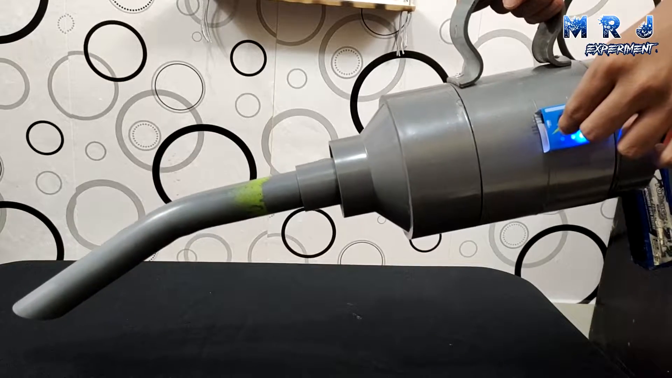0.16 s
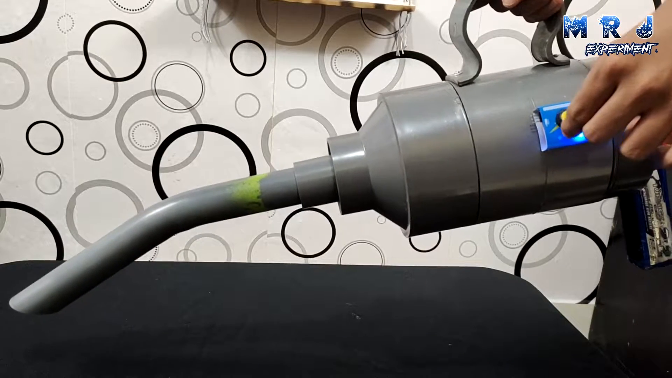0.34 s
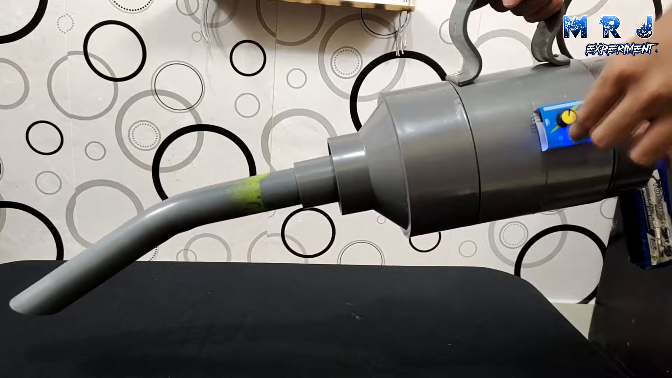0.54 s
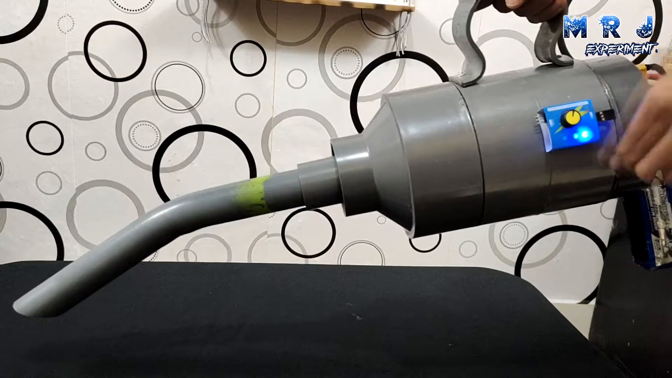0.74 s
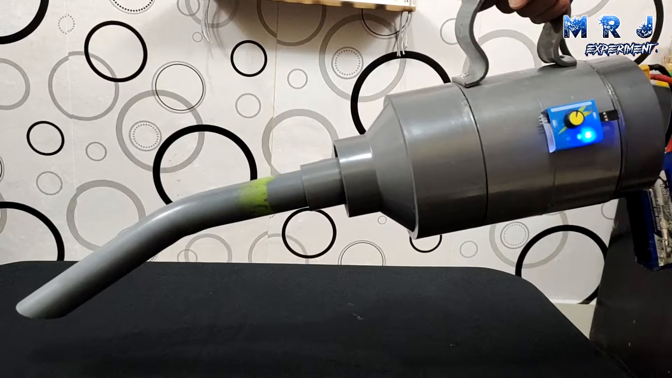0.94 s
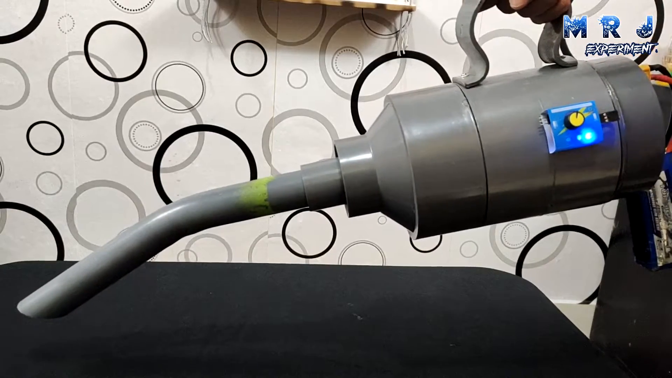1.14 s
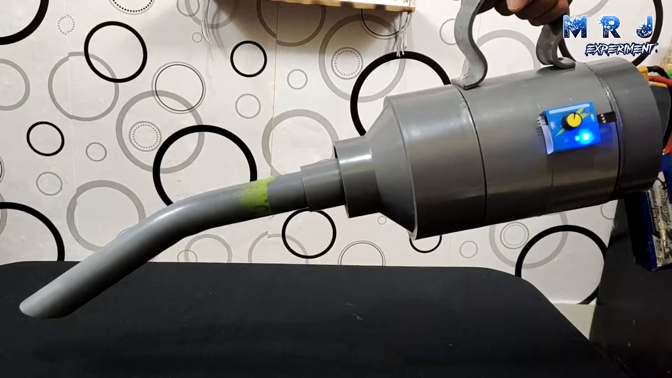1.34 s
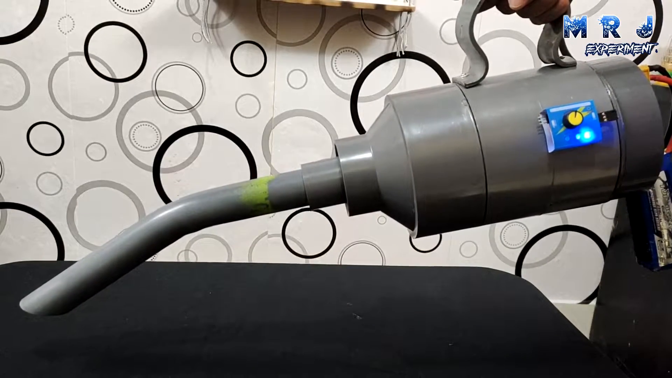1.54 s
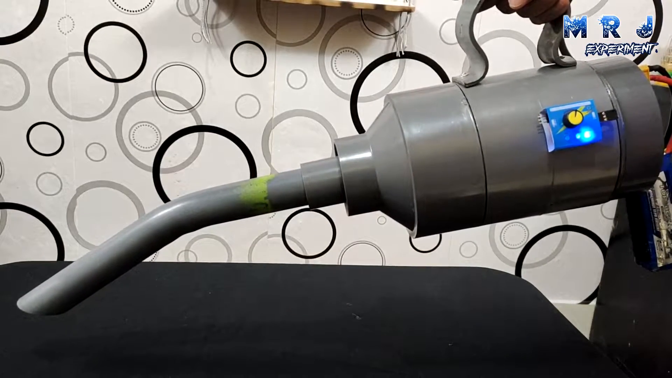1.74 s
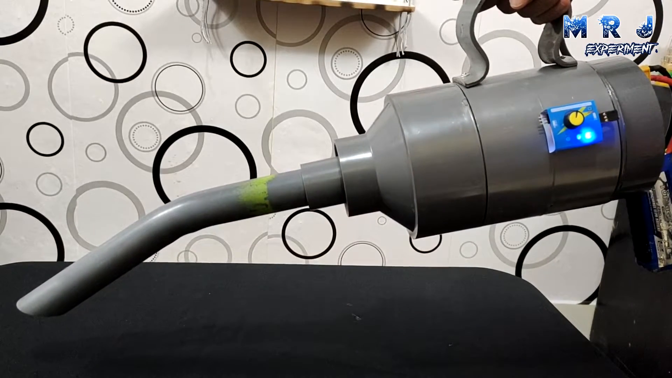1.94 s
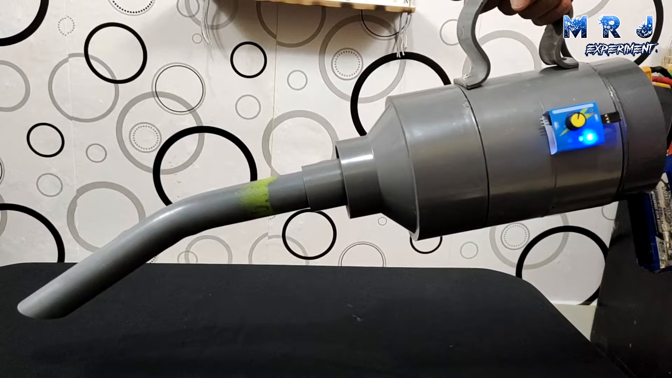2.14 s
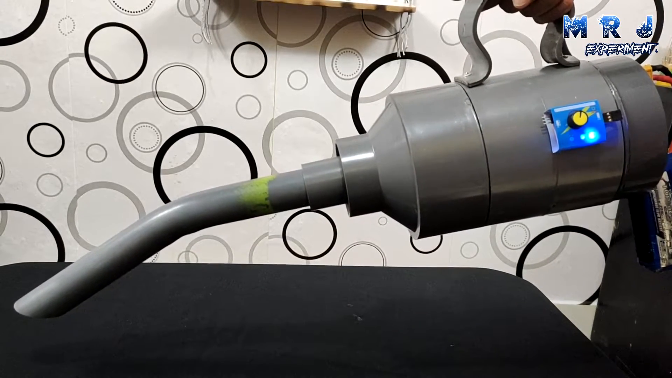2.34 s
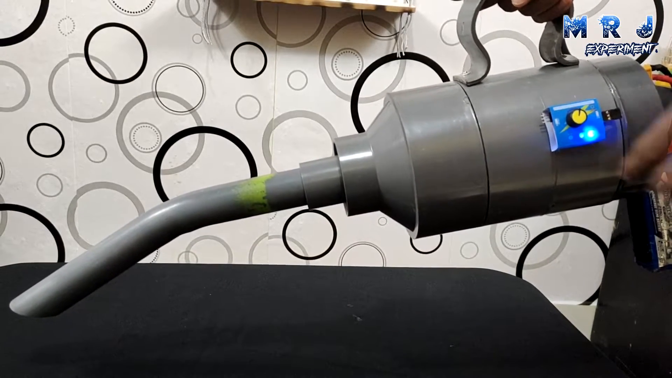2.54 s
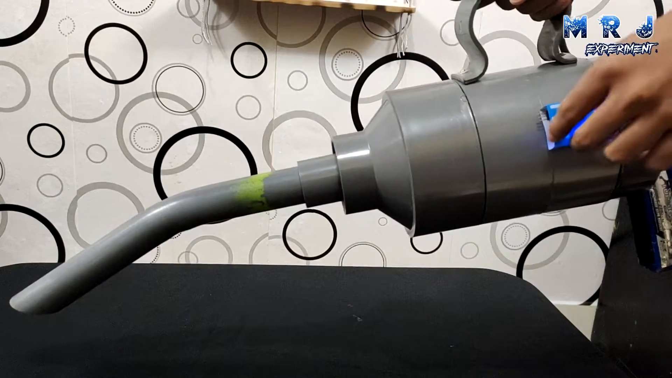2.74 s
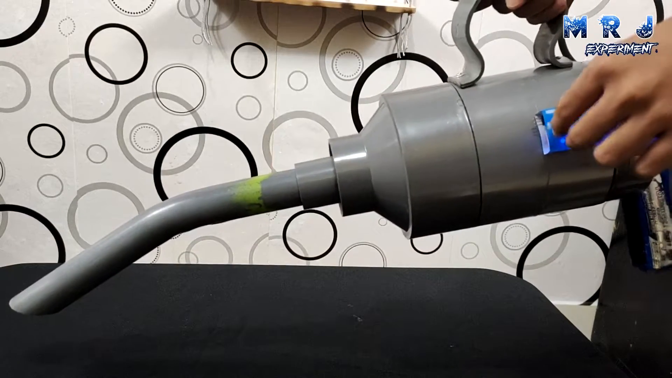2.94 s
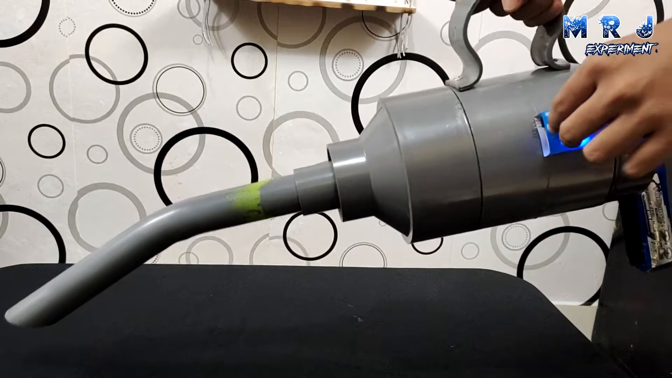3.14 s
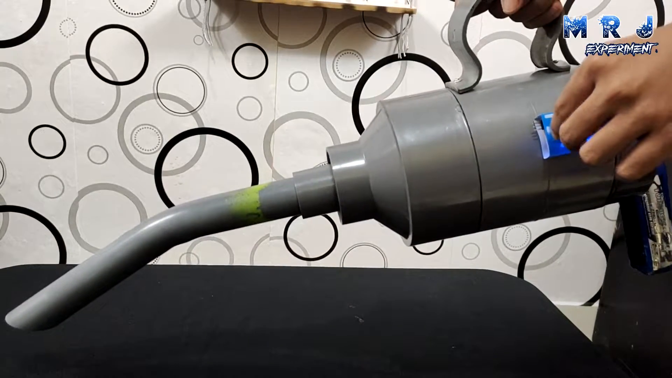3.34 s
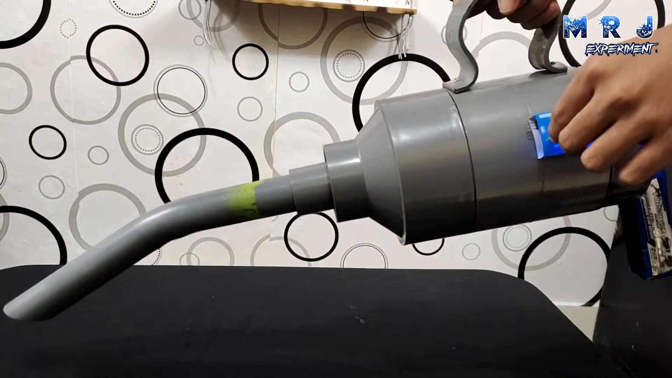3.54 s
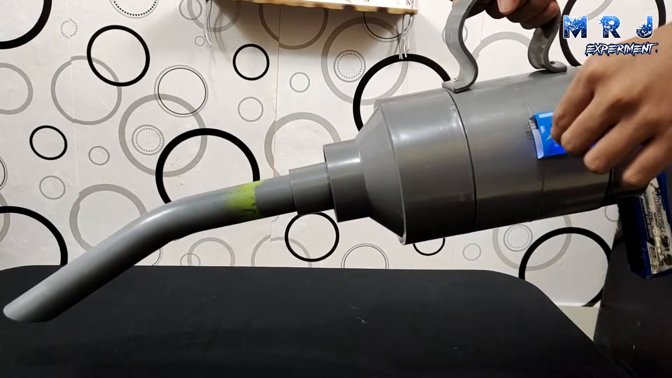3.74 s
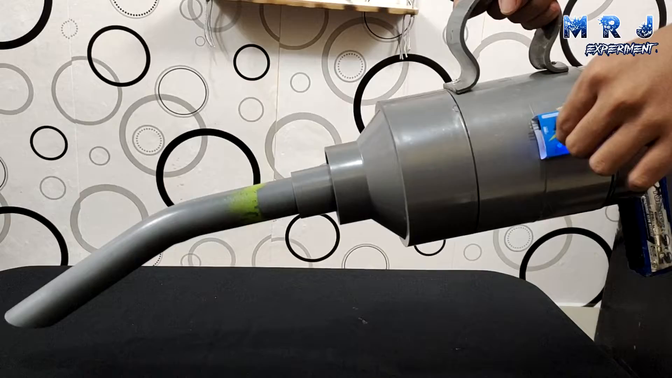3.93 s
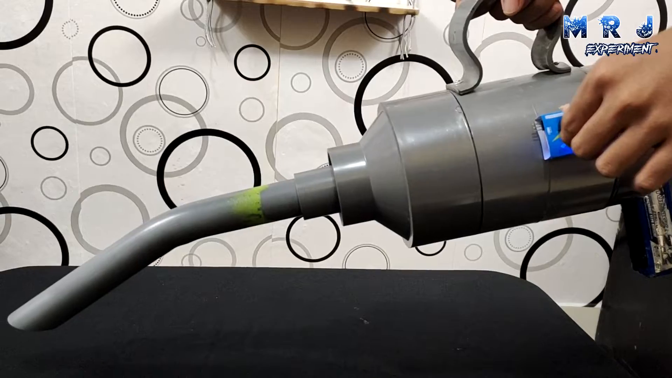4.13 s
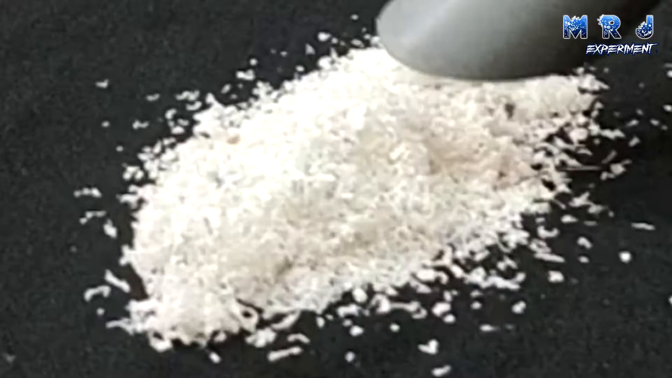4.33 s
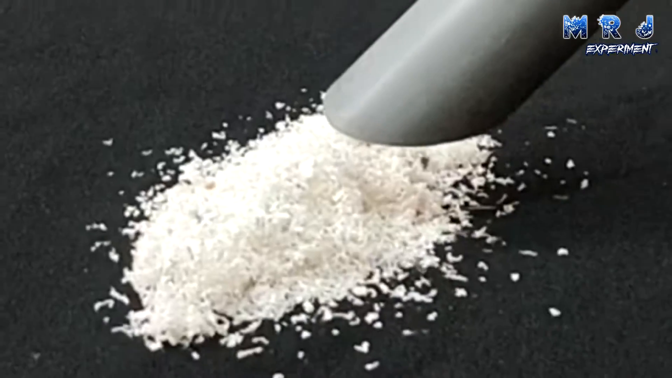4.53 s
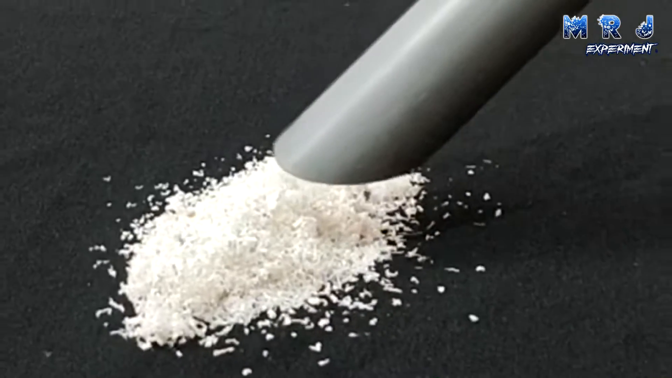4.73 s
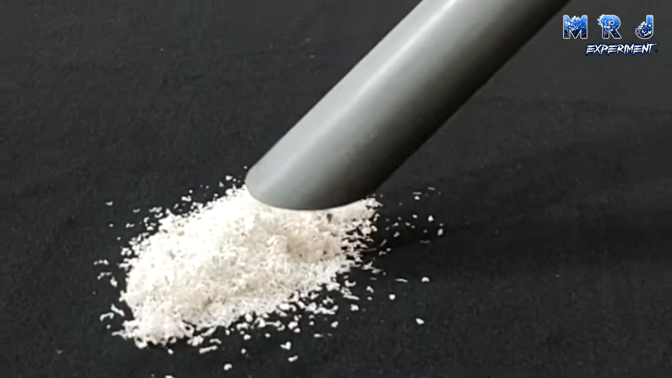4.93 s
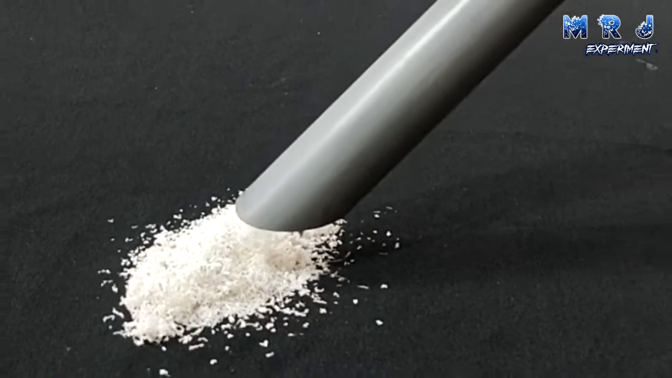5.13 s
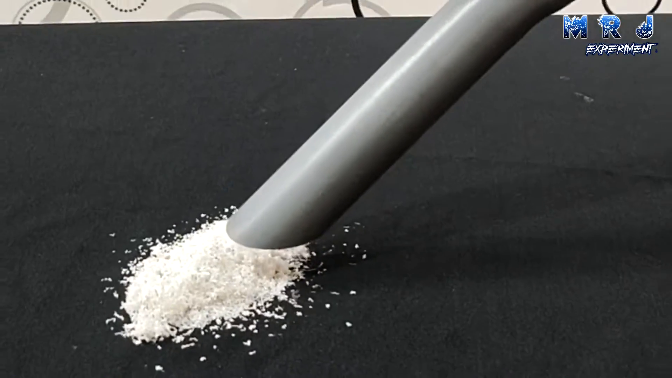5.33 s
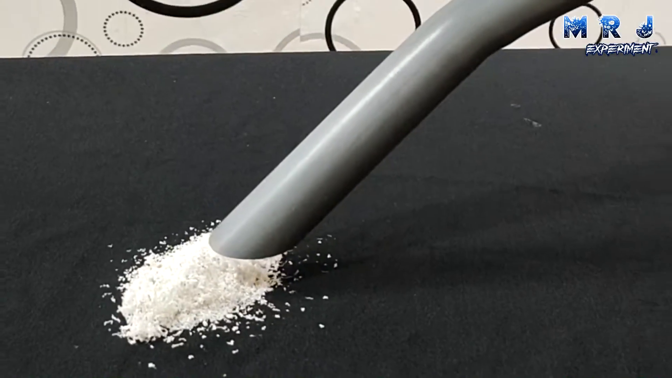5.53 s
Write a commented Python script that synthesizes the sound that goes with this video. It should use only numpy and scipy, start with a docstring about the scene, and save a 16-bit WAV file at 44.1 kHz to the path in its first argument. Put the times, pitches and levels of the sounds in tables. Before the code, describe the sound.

A small motor and fan drone steadily with buzzy whine, airflow and faint piercing whistle, soon falling to a softer level. The power goes off and the pitch sags through fluttering rattles and short rings. Silence follows abruptly, then a close, overloaded suction roar at higher pitch leans left, its airflow thickening as crumbs load the pipe. Stereo, short room reflections.

```python
"""Pipe vacuum cleaner, low then full speed

A homemade vacuum cleaner of plastic pipe in a small room, on two microphones. At a low setting the motor
hums (shaft orders) in pulsed air noise under a thin speed-controller whistle, drops in level, then coasts
down as the knob is turned, its orders sweeping through fixed modes. After a silent cut it runs at full speed,
closer to the left microphone, loud enough to clip; crumbs load the pipe and the airflow grows. Short bright
cracks of decaying noise stand in the loud full-speed roar."""
import sys
import numpy as np
from scipy import signal
from scipy.fft import rfft, irfft, next_fast_len
from scipy.io import wavfile
from scipy.ndimage import uniform_filter1d

SR = 44100
rng = np.random.default_rng(int(sys.argv[2]) if len(sys.argv) > 2 else 0)


def waveform_to_disk(signal):
    """Save audio, clipped to [-1, 1], as 16-bit WAV at the path in sys.argv[1]."""
    frames = np.transpose(np.atleast_2d(signal))
    scaled = np.clip(frames, -1, 1) * 32767
    samples = np.round(scaled).astype(np.int16)
    wavfile.write(sys.argv[1], SR, samples)


N = 246078
T = np.arange(N) / SR
STEP = 32  # samples between control values
SLOW_HZ, FULL_HZ = 108.0, 236.2  # shaft speed at the low setting and at full speed
CUT_OUT, CUT_IN = 4.3925, 4.661  # silence between them (s)
HUM_END_S, HUM_FADE_DB_S = 3.49, 307  # the hum outlasts the power a little, then fades (dB per s)
EARLY = 0.00012  # the sound reaches the left microphone sooner (s)

# tilt of the airflow and rattle noise between the microphones: freq_hz, left_over_right_db
SLOW_LEAN = [(60, -0.5), (180, -3.5), (550, 0.5), (1650, 1), (4970, 4), (15000, -3.5)]
# level of the rattle while coasting; airflow follows it by about half, hiss moves more strongly than it does:
# time_s, level_db
RATTLING = [(3.5, -25.5), (3.6, -36.5), (3.77, -50.5), (3.815, -35.5), (3.97, -31), (4.06, -24.5),
            (4.14, -28), (4.23, -48.5), (4.39, -59)]


def shaft_speed():
    """Shaft speed in Hz: settling to steady, then air drag and bearing friction slow the rotor."""
    settle_hz, settle_s = .3, .6  # excess at the start, time constant of its fading
    off_s, spin_down_s = 3.465, 1.78  # power off, time constant of the air drag
    drag_hz = 71.7  # bearing friction as a speed offset
    coasting = np.maximum(T - off_s, 0)
    settling = settle_hz * np.exp(-T / settle_s)
    return settling + (SLOW_HZ + drag_hz) * np.exp(-coasting / spin_down_s) - drag_hz


def slow_hum(angle):
    """Unbalance, blades and brushes repeat every turn: a comb of shaft orders."""
    # shaft orders 1, 2, 3 .. at the low setting, before and after the level drops:
    # left_before_db, right_before_db, left_after_db, right_after_db, left_lead_rad
    low_orders = [(-50.0, -50.0, -64.0, -64.0, 0.0), (-34.0, -38.0, -48.0, -52.0, -0.0),
                  (-24.0, -22.0, -40.0, -38.0, 0.1), (-33.0, -33.0, -47.0, -48.0, -0.0),
                  (-46.0, -42.0, -60.0, -54.0, -0.3), (-42.0, -46.0, -58.0, -62.0, 0.6),
                  (-48.0, -51.0, -54.0, -61.0, 0.4), (-33.0, -40.0, -48.0, -61.0, 0.4),
                  (-30.0, -29.0, -39.0, -38.0, 0.1), (-36.0, -38.0, -46.0, -50.0, -1.3),
                  (-36.0, -39.0, -52.0, -40.0, 0.1), (-39.0, -45.0, -57.0, -67.0, -3.0),
                  (-37.0, -47.0, -49.0, -58.0, -0.3), (-33.0, -27.0, -47.0, -41.0, -0.0),
                  (-42.0, -38.0, -53.0, -49.0, 3.1), (-36.0, -36.0, -48.0, -48.0, -3.1),
                  (-38.0, -38.0, -42.0, -41.0, -1.1), (-50.0, -39.0, -59.0, -45.0, -2.4),
                  (-37.0, -36.0, -51.0, -50.0, 2.6), (-41.0, -40.0, -53.0, -44.0, 1.3),
                  (-41.0, -36.0, -44.0, -32.0, -1.1), (-37.0, -32.0, -32.0, -29.0, 0.5),
                  (-32.0, -24.0, -42.0, -32.0, -0.6), (-37.0, -35.0, -54.0, -58.0, 2.9),
                  (-29.0, -32.0, -38.0, -48.0, -2.3), (-35.0, -39.0, -37.0, -42.0, -2.8),
                  (-31.0, -41.0, -47.0, -56.0, -2.1), (-33.0, -43.0, -54.0, -57.0, -2.2),
                  (-29.0, -33.0, -45.0, -45.0, -1.1), (-30.0, -35.0, -45.0, -47.0, 1.4),
                  (-30.0, -35.0, -40.0, -43.0, -2.4), (-30.0, -44.0, -46.0, -50.0, 1.8),
                  (-30.0, -32.0, -44.0, -48.0, 0.4), (-27.0, -38.0, -43.0, -52.0, -0.1),
                  (-36.0, -33.0, -41.0, -32.0, -0.2), (-37.0, -43.0, -40.0, -41.0, -2.0),
                  (-43.0, -26.0, -46.0, -40.0, -1.5), (-31.0, -28.0, -46.0, -33.0, -2.7),
                  (-38.0, -36.0, -51.0, -51.0, -0.6), (-36.0, -34.0, -52.0, -43.0, 2.1),
                  (-36.0, -37.0, -52.0, -51.0, 1.9), (-38.0, -36.0, -51.0, -44.0, 0.1),
                  (-33.0, -31.0, -45.0, -43.0, 2.6), (-41.0, -41.0, -45.0, -44.0, 0.7),
                  (-41.0, -35.0, -54.0, -45.0, -1.8), (-30.0, -30.0, -44.0, -50.0, 2.4),
                  (-47.0, -54.0, -48.0, -52.0, 1.2), (-51.0, -52.0, -49.0, -58.0, 0.4),
                  (-44.0, -47.0, -50.0, -53.0, 0.4)]
    # the higher orders, from brushes and bearings, scattered around a smooth level:
    # freq_hz, left_before_db, right_before_db, left_after_db, right_after_db
    high_orders = [(5280, -48.5, -50, -55, -70), (6490, -45.5, -56.5, -47, -63),
                   (7450, -40, -70, -46.5, -85), (8670, -60.5, -70.5, -67.5, -86)]
    # a strong order swells or sinks for a while: centre_s, half_length_s, change_db, freq_hz
    swells = [(2.595, .063, 12, 972), (3.32, .1, 6, 972), (1.95, .45, 4, 1836), (2.95, .22, -9, 1836),
              (1.4, .3, 6, 2160), (1.93, .42, -10, 2484), (2.95, .42, 5, 2484), (3, .3, 8, 2592),
              (1.7, .42, -6, 2700), (1.9, .45, -10, 2916), (3.15, .3, 10, 2916), (2.72, .16, 9, 3132),
              (3.4, .2, 8, 3564), (3.6, .45, -14, 3888), (1.8, .5, -9, 3996), (2.87, .5, 7, 3996),
              (1.85, .5, 4, 4320), (1.75, .35, 7, 4428), (1.85, .32, 8, 4536), (1.3, .2, 6, 4644),
              (1.9, .38, -9, 4644), (1.28, .18, 9, 4752), (1.87, .3, 6, 4860), (1.27, .16, 13, 4968),
              (1.28, .18, 12, 5076), (1.26, .15, 12, 5184), (2.95, .4, 10, 5292), (2.75, .2, -7, 6156)]
    size = round(3.65 * SR)
    t = T[:size:STEP]
    uneven = angle + 0.008 * wobble(30)  # the shaft runs a little unevenly; all orders share it
    fade_db = -HUM_FADE_DB_S * np.maximum(t - HUM_END_S, 0)
    out = np.zeros((2, N))
    for k, (*db, lead) in enumerate(order_levels(SLOW_HZ, 82, high_orders, low_orders), 1):
        hz = k * SLOW_HZ
        after = quieter(t, hz)
        level_db = np.outer(db[:2], 1 - after) + np.outer(db[2:], after)
        swell_db = sum(bump(t, s, half, change) for s, half, change, swell_hz in swells
                       if round(swell_hz / SLOW_HZ) == k)
        out[:, :size] += order(uneven[:size], k, hz, lead, level_db + fade_db + swell_db,
                               drift_db=min(.6 + 0.035 * k, 2.6), jitter=0.28 + 0.008 * k)
    return out


def slow_air(angle):
    """Airflow, inlet warble and hiss; each turn of the fan pulses airflow and hiss a little."""
    # spectrum of the airflow at the low setting: freq_hz, relative_db per Hz
    air_spectrum = [(24, -76), (40, -38), (209, -22.5), (262, -17), (322, -3), (420, -8), (650, -14),
                    (800, -10.5), (977, -3), (1310, -15), (1600, -15.5), (2200, -9.5), (2800, -10),
                    (3980, -15.5), (7180, -23.5), (9000, -45), (11700, -62.5), (19800, -120)]
    # spectrum of the hiss: freq_hz, relative_db per Hz
    hiss_spectrum = [(6000, -33.5), (8200, 3), (9340, 3), (13000, 1), (13800, -3.5), (14300, -15),
                     (15600, -52.5)]
    air_follows, hiss_follows = 0.46, 2.7  # dB per dB that the rattle sinks while coasting
    sink_db = curves(RATTLING)[0] - RATTLING[0][1]
    air_db = between((-22, -32)) + air_follows * sink_db
    hiss_db = between((-44.5, -54.5)) + hiss_follows * sink_db
    gate = 1 + 0.057 * np.sin(angle)

    air_drift = amp(.6 * wobble(6.4) + .4 * wobble(2.7))
    air = air_drift * rush(lambda hz: amp(along(air_spectrum, hz)), SLOW_LEAN, gate, patchy_db=5)

    fade_db = -HUM_FADE_DB_S * np.maximum(T - HUM_END_S, 0)
    warble_gain = amp(-9.5 + fade_db + 4.4 * wobble(8)) * (0.38 + 0.46 * quieter(T))
    warble = warble_gain * narrow(970, 10)

    hiss = rush(lambda hz: amp(along(hiss_spectrum, hz)), SLOW_LEAN, gate, patchy_db=6.5)
    return amp(air_db) * (air + warble) + amp(hiss_db + 1.5 * wobble(5.44)) * hiss


def whistle(angle, hz, db):
    """The speed controller's switching tone, a little unsteady; each turn bends it, giving side lines."""
    phase = 2 * np.pi * hz * T + 0.32 * np.sin(angle) + .5 * wobble(30) + .35 * wobble(300)
    return np.sqrt(2) * amp(db + 1.5 * wobble(16)) * np.sin(phase)


def slow_whistle(angle):
    """The switching tone at the low setting, stronger at the right; it dips once, then fades quickly."""
    fade_db = -402 * np.maximum(T - HUM_END_S, 0)  # dB per s
    tone_db = between((-44, -40)) + bump(T, s=2.84, half=0.18, db=-7.5) + fade_db
    return whistle(angle, 14729, tone_db) * amp([[-9], [4]])


def coast(angle):
    """Slowing down: the comb of orders sweeps through the fixed modes of canister and shell."""
    # level of the low drone while coasting: time_s, level_db
    drone_levels = [(3.5, -43), (3.62, -32), (3.655, -32), (3.7, -26), (3.84, -34.5), (3.89, -37.5),
                    (3.94, -44), (4.035, -34), (4.07, -44), (4.17, -42), (4.24, -60), (4.33, -53),
                    (4.39, -50)]
    # low orders of the freewheeling rotor: order_number, relative_db
    rotor_orders = [(2, 1), (3, -25), (4, -1), (5, 0.5), (6, -5), (7, -6), (8, 3), (10, -14), (12, -12)]
    # low modes of the canister: freq_hz, width_hz (before squaring), relative_db
    drum_modes = [(164, 9, -20), (238, 16, -12), (324, 16, 0), (345, 20, -5), (450, 30, -24),
                  (545, 40, -25)]
    # broad spectrum of the rattle: freq_hz, relative_db per Hz (before the shell modes)
    rattle_spectrum = [(500, -63), (1000, -12), (1560, -16.5), (2500, -4), (3600, -14), (7260, -9.5),
                       (9250, -44), (13000, -30), (14600, -22), (15200, -41)]
    # modes of the shell: freq_hz, width_hz, relative_db
    shell_modes = [(1037, 43, 14), (1112, 27, 16), (1322, 26, 8), (2120, 28, 15), (2430, 34, 14),
                   (2580, 40, 16), (2940, 120, 9), (3590, 30, 26), (3880, 49, 14), (4170, 70, 16),
                   (4460, 70, 9), (4710, 34, 12)]
    (drone_db,), (rattle_db,) = curves(drone_levels), curves(RATTLING)
    on = np.clip((T - 3.46) / 0.05, 0, 1) * (T < CUT_OUT)
    share = np.sqrt(np.mean(on ** 2))  # makes up for taking the rms over the silence too
    uneven = (angle + 0.057 * wobble(40))[on > 0]  # the freewheeling rotor runs unevenly

    comb, buzz = np.zeros((2, N))
    comb[on > 0] = unit(sum(amp(db) * np.cos(round(k) * uneven + k * k) for k, db in rotor_orders))
    buzz[on > 0] = sum(np.cos(k * uneven + k * k) for k in range(9, 90))

    rough = 2.5  # air noise against shaft orders in the drone
    drum = lambda f: sum(modes([(c, w, db / 2)], f) ** 2 for c, w, db in drum_modes)
    drone = unit(filtered(on * (comb + rough * rng.standard_normal(N)), drum))

    shell = lambda f: amp(along(rattle_spectrum, f)) * (.5 + np.abs(modes(shell_modes, f)))
    buzz = unit(room(filtered([on * buzz] * 2, shell), wet_db=-10.0, t60=0.3))
    noise = on * rush(shell, SLOW_LEAN, 1 + 0.2 * np.cos(angle), patchy_db=3.0)
    rattle = amp(rattle_db) * (amp(-15.5) * share * buzz + noise)
    return share * amp(drone_db) * drone + rattle + rings()


def rings():
    """The shell rings as an order passes a mode: short, slightly rough tones, pulled down in pitch."""
    # centre_s, half_length_s (to 1/e), pitch_hz at the centre, level_db at the centre
    ring_tones = [(3.51, 0.095, 1057, -37), (3.6, 0.13, 1128, -42.5), (3.77, 0.056, 1380, -50.5),
                  (3.835, 0.074, 1035, -40.5), (4.098, 0.033, 1333, -40.5), (4.119, 0.04, 952, -36),
                  (4.333, 0.13, 553, -50.5)]
    sag = 0.19  # the slowing rotor pulls the ring down (share of pitch per s)
    out = np.zeros((2, N))
    for s, half, hz, db in ring_tones:
        t = T - s
        phase = 2 * np.pi * hz * (t - sag * t * t / 2) + .5 * wobble(40)
        level = np.sqrt(2) * amp(db + 3.4 * wobble(30)) * np.exp(-(t / half) ** 2)
        out += level * np.sin([phase + .3, phase - .3])
    return out


def full_speed():
    """Shaft orders over strong airflow; the pipe's air column sings in narrow bands."""
    # shaft orders 1, 2, 3 .. before and after the crumbs enter, ahead of the overall gain:
    # left_before_db, right_before_db, left_after_db, right_after_db
    low_orders = [(-34.0, -34.0, -30.0, -31.0), (-28.0, -28.0, -26.0, -26.0), (-55.0, -47.0, -53.0, -53.0),
                  (-36.0, -32.0, -44.0, -33.0), (-30.0, -38.0, -30.0, -39.0), (-35.0, -49.0, -39.0, -40.0),
                  (-41.0, -55.0, -41.0, -45.0), (-37.0, -44.0, -34.0, -45.0), (-32.0, -47.0, -33.0, -43.0),
                  (-36.0, -47.0, -39.0, -53.0), (-27.0, -44.0, -28.0, -38.0), (-42.0, -39.0, -29.0, -45.0),
                  (-33.0, -45.0, -30.0, -49.0), (-27.0, -41.0, -25.0, -35.0), (-22.0, -43.0, -37.0, -41.0),
                  (-22.0, -59.0, -25.0, -52.0), (-21.0, -41.0, -29.0, -43.0), (-28.0, -57.0, -27.0, -53.0),
                  (-36.0, -50.0, -39.0, -52.0)]
    # the higher orders, scattered around a smooth level:
    # freq_hz, left_before_db, right_before_db, left_after_db, right_after_db
    high_orders = [(4740, -31, -59, -30, -62), (5180, -53.5, -62.5, -61, -59.5),
                   (7260, -47.5, -73, -47, -73)]
    # spectrum of the airflow: freq_hz, relative_db per Hz
    air_spectrum = [(24, -81), (40, -51), (96, -49), (179, -23.5), (223, -15.5), (280, -18), (333, -2.5),
                    (417, -7.5), (484, -6.5), (721, -11.5), (925, -7), (1560, -10), (2300, -10.5),
                    (2750, -4.5), (3930, -10.5), (4900, -19.5), (5850, -29.5), (13000, -43.5), (15500, -59)]
    # tilt of the airflow between the microphones: freq_hz, left_over_right_db
    air_lean = [(60, 2), (150, -6.5), (380, 5.5), (950, 0.5), (2380, 8), (5980, 21), (15000, 0)]
    # air column singing: freq_hz, width_hz (before squaring), level_db (lowest: before the crumbs)
    pipe_tones = [(328, 18, -33), (507, 4, -27), (1215, 10, -38)]
    # overall gain, rising from the cut: time_s, gain_db
    overall_gain = [(4.665, -4), (4.771, 0.5), (5.053, 1), (5.58, 0.5)]
    crumbs_s, crumbs_len_s = 4.97, 0.054  # crumbs load the pipe: start, length
    angle = 2 * np.pi * np.cumsum(FULL_HZ * (1 + 0.0004 * wobble(6))) / SR
    start = round(CUT_IN * SR)
    loading = (T - crumbs_s) / crumbs_len_s
    loaded = np.clip(loading, 0, 1)
    after = loaded[start::STEP]

    hum = np.zeros((2, N))
    for k, (*db, lead) in enumerate(order_levels(FULL_HZ, 31, high_orders, low_orders), 1):
        level_db = np.outer(db[:2], 1 - after) + np.outer(db[2:], after)
        hum[:, start:] += order(angle[start:], k, k * FULL_HZ, lead, level_db,
                                drift_db=.4 + .03 * k, jitter=.1 + .025 * k)

    gate = 1 + 0.17 * np.sin(angle)
    air = rush(lambda hz: amp(along(air_spectrum, hz)), air_lean, gate, patchy_db=1.2, wet_db=-8)
    air = amp(-16.5 + 2 * loaded) * air  # the load adds 2 dB

    low, *high = (amp(db) * narrow(c, w) for c, w, db in pipe_tones)
    # the lowest pipe tone grows by 7.5 dB, 3.7 lengths ahead of the rest
    song = low * amp(7.5 * np.clip(loading + 3.7, 0, 1)) + sum(high)
    tone = whistle(angle, 14702, db=-62.0)
    return amp(curves(overall_gain)[0]) * (hum + air + song + tone) + cracks()


def cracks():
    """Short bright cracks of decaying noise in the full-speed roar."""
    # time_s, level_db at the onset (before the bass is taken out)
    crack_levels = [(5.0697, -33), (5.2744, -27.5), (5.4899, -25.5)]
    out, t = np.zeros(N + SR), T[:STEP * 20]
    for s, db in crack_levels:
        out[round(s * SR):][:len(t)] += amp(db - 60 * t / .008) * rng.standard_normal(len(t))
    return filtered(out[:N], lambda hz: hz ** 2 / (hz ** 2 + 6000 ** 2))


def order_levels(shaft_hz, count, high_orders, low_orders):
    """One row per order, four dB levels and left lead: lower ones given singly, higher ones scattered."""
    scatter_db = 4.5  # of the higher orders around a smooth level
    f, *cols = np.transpose(high_orders)
    hz = shaft_hz * np.arange(1, count + 1)
    rows = np.transpose([np.interp(hz, f, c) for c in cols])
    rows = rows + scatter_db * rng.standard_normal(rows.shape)
    rows = np.c_[rows, 2 * np.pi * hz * EARLY]
    rows[:len(low_orders), :len(low_orders[0])] = low_orders
    return rows


def order(angle, k, hz, lead, level_db, drift_db, jitter):
    """One multiple of the shaft angle in both channels; level (one value a step) and phase drift."""
    phase_spread = 1.24  # radians between orders: partly in step, so that each turn throbs
    size = len(angle)
    slow, quick, left, right, slip = (wobble(rate, size=size, step=STEP)
                                      for rate in (1.42, 14, 7.27, 6.88, 35))
    apart = np.clip(hz / 2500, 0, 1)  # the channels drift together in the bass
    drift = (1.02 + 0.57 * apart) * quick + apart * (1.25 * slow + np.array([left, right]))
    gain = np.repeat(amp(level_db + drift_db * drift), STEP, axis=1)[:, :size]
    phase = k * angle + phase_spread * rng.standard_normal() + jitter * np.repeat(slip, STEP)[:size]
    return np.sqrt(2) * gain * np.sin([phase + lead / 2, phase - lead / 2])


def rush(colour, lean, gate, patchy_db, wet_db=-6.0):
    """Stereo noise of rms 1, pulsed by gate, coloured, leaning to one side, in the room."""
    # how alike the two microphones hear the noise, ahead of the room: freq_hz, likeness (1 is identical)
    alike = [(60, .97), (300, .95), (700, .85), (1500, .3), (4000, .1), (12000, 0)]
    turn = lambda hz: np.arccos(np.clip(along(alike, hz), -1, 1)) / 2
    noise = patches(gate * rng.standard_normal((2, N)), patchy_db)
    mid, side = filtered(noise, lambda hz: colour(hz) * [np.cos(turn(hz)), np.sin(turn(hz))])
    tilt = lambda hz: amp(np.outer([.5, -.5], along(lean, hz)))
    left_first = lambda hz: np.exp(np.outer([1j, -1j], np.pi * hz * EARLY))
    pair = filtered([mid + side, mid - side], lambda hz: tilt(hz) * left_first(hz))
    return unit(room(pair, wet_db=wet_db, t60=0.081))


def patches(x, patchy_db):
    """Random gain in patches of time and frequency, as turbulence comes and goes."""
    z = signal.stft(x, nperseg=1024)[2]
    field = rng.standard_normal(z.shape[1:])
    field = uniform_filter1d(uniform_filter1d(field, size=5, axis=0), size=5, axis=1)
    return signal.istft(z * amp(patchy_db * unit(field)), nperseg=1024)[1][:, :N]


def room(x, wet_db, t60):
    """A short tail of its own for each microphone, from 1 ms on, weak in the bass: a jagged, fixed colour."""
    t = np.arange(SR // 4) / SR
    tail = rng.standard_normal((2, len(t))) * amp(-60 * t / t60) * (t > .001)
    wet = signal.fftconvolve(x, tail / np.linalg.norm(tail[0]), axes=1)[:, :N]
    return x + amp(wet_db) * filtered(wet, lambda hz: hz ** 2 / (hz ** 2 + 600 ** 2))


def narrow(hz, width):
    """Noise in one sharp resonance, rms 1."""
    return unit(filtered(rng.standard_normal(N), lambda f: modes([(hz, width, 0)], f) ** 2))


def modes(table, f):
    """Summed response of (Hz, width, dB) resonances, alternating in sign."""
    return sum((-1) ** k * amp(db) * 1j * f * w / (c * c - f * f + 1j * f * w)
               for k, (c, w, db) in enumerate(table))


def quieter(t, hz=0):
    """0 before the level drops, 1 after; the treble follows later."""
    start_s, length_s, later_s = 0.94, 0.15, 0.014  # later_s: delay per kHz
    return np.clip((t - start_s - later_s * hz / 1000) / length_s, 0, 1)


def between(pair_db):
    """From the level before the drop to the level after."""
    return pair_db[0] + (pair_db[1] - pair_db[0]) * quieter(T)


def bump(t, s, half, db):
    """A flat-topped change of level around s."""
    return db * np.exp(-((t - s) / half) ** 6)


def amp(db):
    """dB to gain."""
    return 10 ** (np.asarray(db) / 20)


def unit(x):
    """x at rms 1."""
    return x / np.sqrt(np.mean(x ** 2) + 1e-20)


def along(points, hz):
    """(Hz, value) points on a log axis."""
    f, v = np.transpose(points)
    return np.interp(np.log(hz + 1), np.log(f + 1), v)


def curves(rows):
    """One value per sample for each column after the time."""
    s, *cols = np.transpose(rows)
    return [np.interp(T, s, c) for c in cols]


def wobble(rate, size=N, step=1):
    """A random curve, rate knots a second, one value every step samples."""
    knots = rng.standard_normal(int(N * rate / SR) + 2)
    return np.interp(np.arange(0, size, step) * rate / SR, np.arange(len(knots)), knots)


def filtered(x, response):
    """x times a complex response of frequency."""
    m = next_fast_len(N + 8192)
    return irfft(rfft(x, m) * response(np.fft.rfftfreq(m, 1 / SR)), m)[..., :N]


def scene():
    """Low setting and coasting, silence, full speed."""
    angle = 2 * np.pi * np.cumsum(shaft_speed()) / SR
    slow = slow_hum(angle) + slow_air(angle) + slow_whistle(angle) + coast(angle)
    return slow * np.clip((CUT_OUT - T) / 0.0018, 0, 1) + full_speed() * (T > CUT_IN)


def record(dry):
    """The loudest peaks clip with a short knee; nothing passes above the band limit."""
    clipped = dry / (1 + np.abs(dry) ** 12) ** (1 / 12)
    return filtered(clipped, lambda hz: hz < 15638)


dry = scene()
out = record(dry)
waveform_to_disk(out)
```